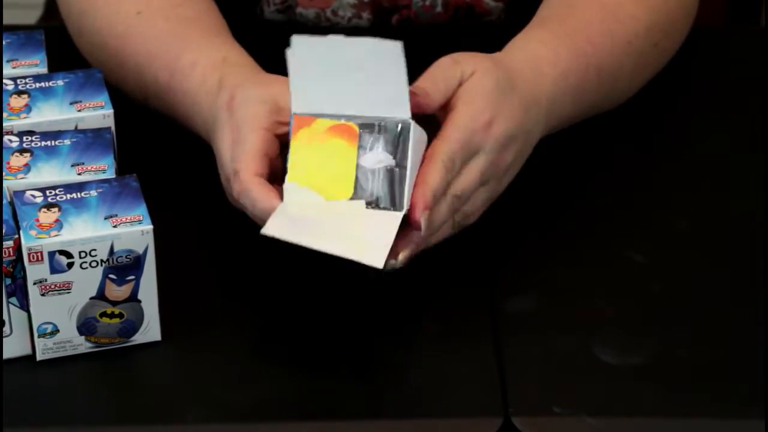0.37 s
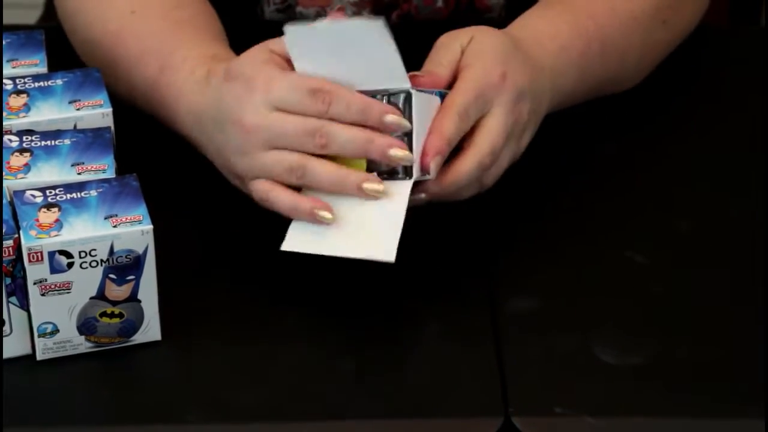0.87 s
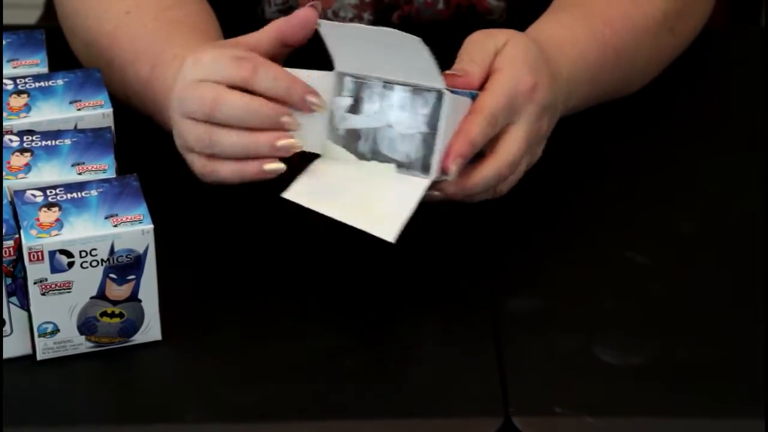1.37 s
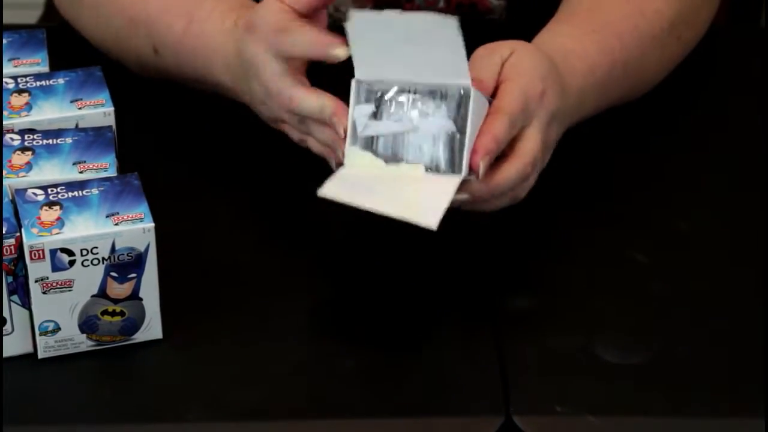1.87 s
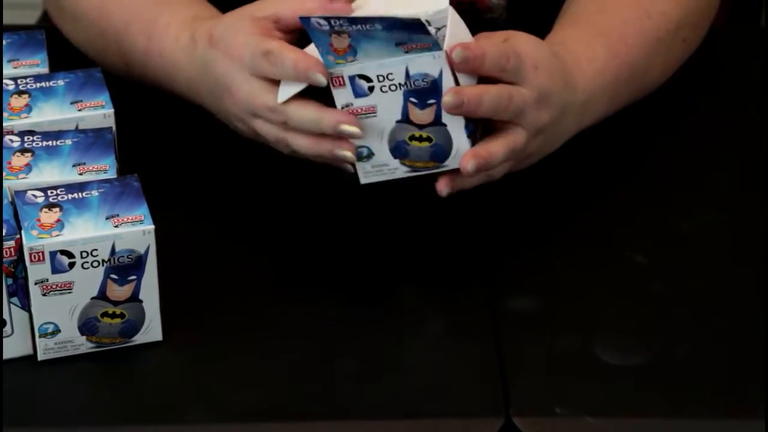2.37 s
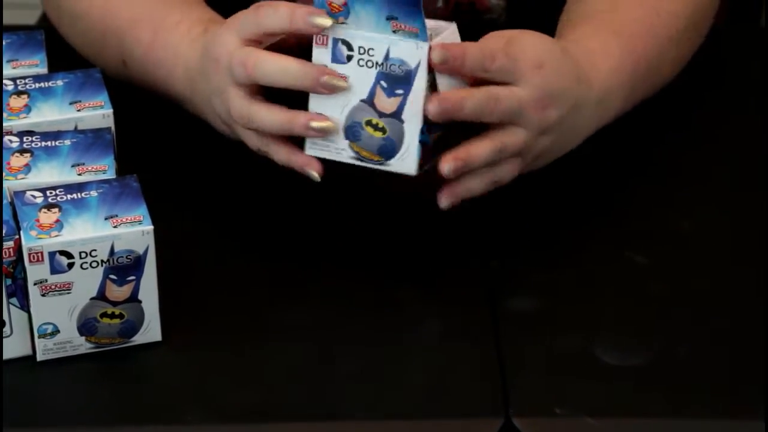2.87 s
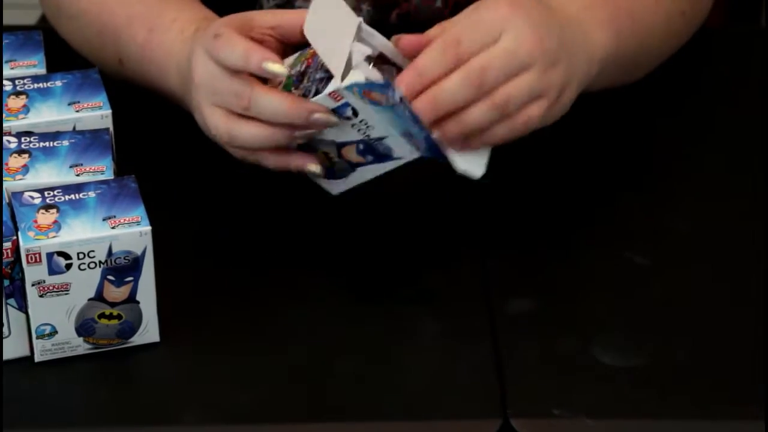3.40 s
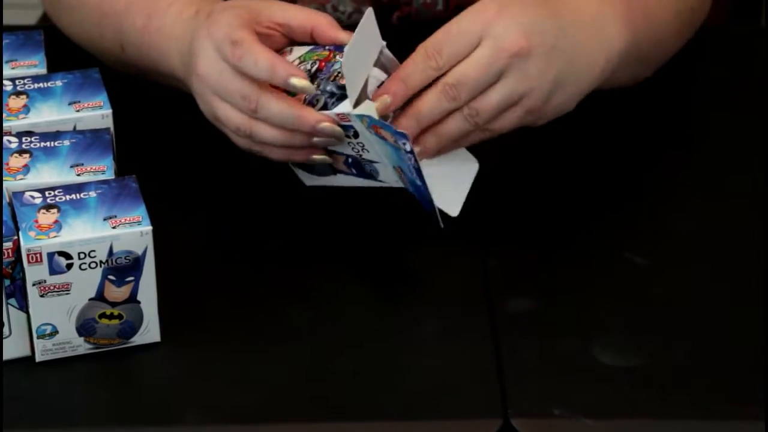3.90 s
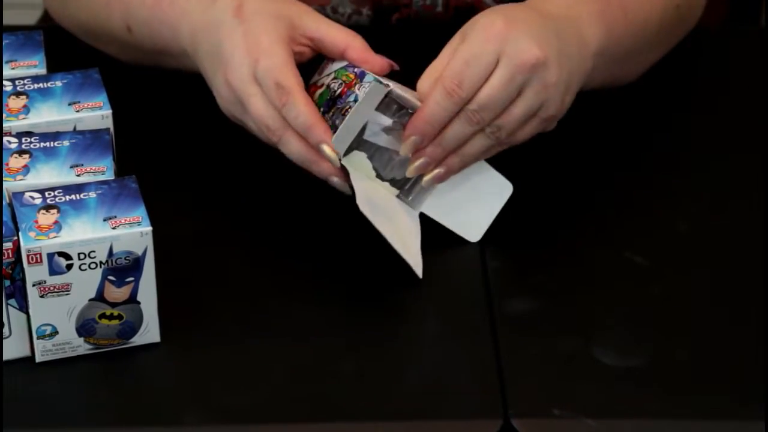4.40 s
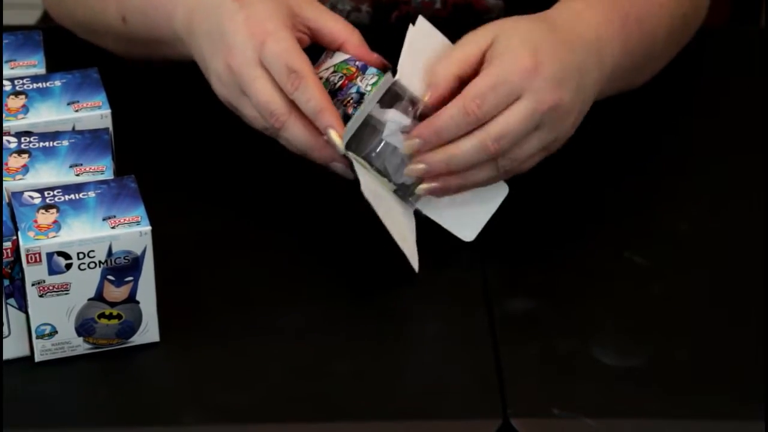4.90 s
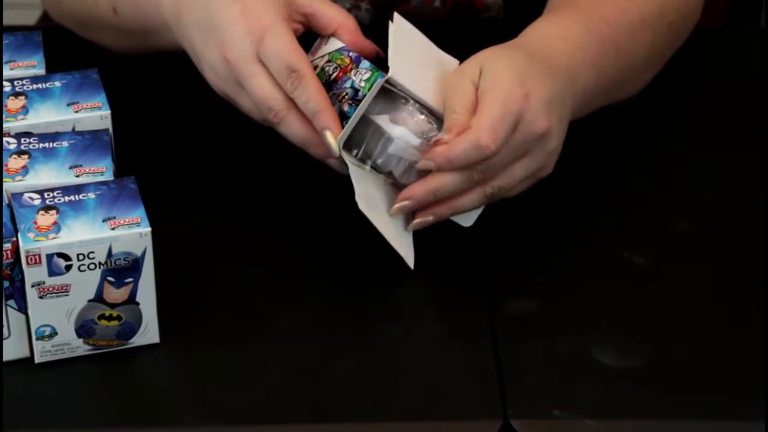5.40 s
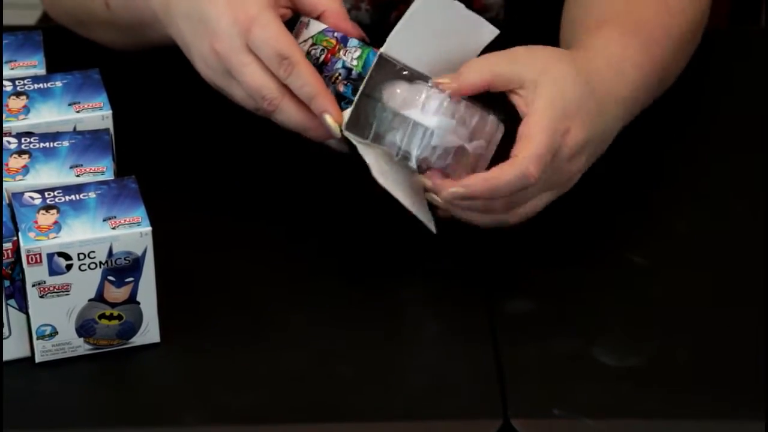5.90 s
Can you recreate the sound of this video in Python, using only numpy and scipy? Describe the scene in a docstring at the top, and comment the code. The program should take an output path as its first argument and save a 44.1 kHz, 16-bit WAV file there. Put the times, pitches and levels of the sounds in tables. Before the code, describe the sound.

Sparse handling of a small hollow card box comes first, with dry light ticks, occasional sharper flap snaps and faint rustling slides. Then thin stiff plastic buckles and scrapes against the card as it is tugged free, much louder and brittle, with overloaded cracks. Close microphone, short room reflections, low background rumble.

```python
"""Close by the microphone in a small room, hands turn a small open cardboard box over a table.
From the start: steady low room rumble, soft pushes on the hollow box, strokes, snaps and light ticks of the card.
From about 4 s a stiff plastic tray is pulled out: louder, denser snaps and scrapes, and the loudest snaps clip.
Snaps are noise bursts through resonances; strokes are random slips through the box modes, ringing creases
and fizz; pushes are short decaying tones; the room answers with tails of fading noise."""
import sys
import numpy as np
from scipy import signal
from scipy.fft import rfft, irfft, next_fast_len
from scipy.io import wavfile
from scipy.ndimage import uniform_filter1d, map_coordinates

SR = 44100
rng = np.random.default_rng(int(sys.argv[2]) if len(sys.argv) > 2 else 0)


def natural_amplitude(level_db):
    """Convert a level in decibels to a linear amplitude factor, elementwise."""
    exponent = np.asarray(level_db, float) / 20
    return 10 ** exponent


def file_out(sig):
    """Save sig as 16-bit WAV at sys.argv[1]."""
    # one column per channel
    cols = np.atleast_2d(sig).T
    # limit, then scale
    lim = np.clip(cols, -1, 1)
    pcm = np.round(lim * 32767).astype(np.int16)
    wavfile.write(sys.argv[1], SR, pcm)


N = 265375  # length in samples, about 6 s

# steady room noise, spectrum before its overall level is set: pitch_hz, relative_level_db
AIR_SPECTRUM = [(12, -49), (20, 5), (163, -5.5), (541, -22), (1150, -17.5), (2810, -46), (14600, -40),
                (15900, -67)]
# decay of the room: pitch_hz, t60_s
ROOM_DECAY = [(300, 0.33), (2000, 0.25), (6000, 0.23), (14000, 0.21)]
# resonances of the box walls: pitch_hz, width_hz, relative_level_db
BOX_MODES = [(320, 114, 1.5), (681, 109, 3), (817, 56.6, 6.5), (1250, 167, 2.5), (1697, 94, 4),
             (2163, 166, 1.5)]
# soft pushes of the hands on the hollow box: time_s, peak_db, pitch_hz
PUSHES = [(0.004, -25.5, 310), (0.417, -29, 352), (4.2, -21, 170), (4.237, -20, 330), (4.561, -19.5, 162),
          (4.61, -19, 327), (5.551, -22.5, 320)]
# strokes of fingers and tray sliding on the card:
# start_s, length_s, sheet_rustle_db, box_walls_over_rustle_db, surface_fizz_over_rustle_db
STROKES = [(-.05, 0.046, -29, -4.5, -8), (0.073, 0.034, -41, -3, -9), (0.247, 0.2, -43.5, 3.5, -6.5),
           (0.476, 0.17, -51, 9.5, -1), (0.843, 0.18, -47.5, -7, 0), (1.099, 0.18, -33.5, -9.5, -4),
           (1.414, 0.19, -48, 0.5, -6.5), (1.662, 0.21, -48.5, 3.5, -3), (2.053, 0.17, -37, 0, -12),
           (2.458, 0.053, -34, -4.5, -7), (2.729, 0.16, -47.5, 3.5, -7.5), (3.063, 0.19, -59, -4, -10),
           (3.28, 0.12, -44.5, 2, -1), (3.45, 0.17, -52, 9, -15), (3.836, 0.12, -34.5, -1, -11),
           (4.122, 0.093, -39.5, 8, -8), (4.296, 0.27, -30.5, -6.5, -17), (4.503, 0.12, -31, 4, -2),
           (4.598, 0.046, -20, 0, -28), (4.727, 0.22, -34.5, -6, -14), (5.152, 0.089, -31, -8, -15),
           (5.248, 0.13, -30.5, -4, -9.5), (5.399, 0.046, -23.5, -32, -12), (5.543, 0.062, -20, -12, -9.5),
           (5.729, 0.15, -23, -19, -18), (5.968, 0.023, -17.5, -11, -18)]
# middle pitch of the creases, lower where the wide tray bends: time_s, pitch_hz
CREASE_PITCH = [(0, 3850), (4.1, 3960), (4.3, 2270), (4.9, 2520), (5.45, 2190), (5.6, 1750), (5.72, 3520)]
# fizz of the sheet surfaces, spectrum: pitch_hz, relative_level_db
FIZZ_SPECTRUM = [(4500, -38), (6500, -10), (10000, -12), (14000, -23), (16500, -27)]
# snaps of card and plastic: time_s, crack_peak_db, knock_over_crack_db, knock_pitch_hz, treble_over_crack_db
SNAPS = [(0.3471, -20, -2, 700, -1), (0.3636, -13, -24, 714, -2), (0.6095, -10.5, -9, 810, -21),
         (0.822, -9.5, -13.5, 780, -3), (0.8408, -14, -12, 875, -22), (1.083, -16, -6.5, 820, -4),
         (1.1216, -18, 1.5, 710, -19), (1.131, -21.5, -5, 794, -19), (1.297, -11, -9, 920, -8),
         (1.4396, -16.5, -4.5, 1190, -36), (2.0783, -8.5, -14, 840, -1.5), (2.1174, -6.5, -2.5, 1290, -4),
         (2.371, -21, -1.5, 785, -23), (2.4092, -7.5, -11.5, 850, -14), (2.8258, -22.5, 8, 1180, -6),
         (3.305, -11.5, -3.5, 910, -38), (3.4143, -14, -5.5, 950, -24), (3.6874, -16, 5.5, 1100, -6),
         (3.8308, -25, -3, 900, 5.5), (3.9, -3.5, -9.5, 930, -13), (3.9164, -7, -7, 810, 7.5),
         (3.936, -12.5, 7, 1410, -26), (3.9855, -7, -28, 1090, -22), (3.996, -3.5, -9.5, 990, -29),
         (4.029, -3.5, -12.5, 1270, 2), (4.1976, -10, 4, 1310, -38), (4.2617, 3, -8, 1200, 5),
         (4.5267, -8.5, -4.5, 730, -9), (4.5481, -2.5, -26, 910, -9), (4.5865, 7, 4, 2180, -7),
         (4.598, -3, -9, 1980, -10), (4.6064, -3, 9.5, 2210, 0.5), (4.6144, 8.5, -9, 710, -2),
         (4.6284, -6.5, 3.5, 755, -24), (4.731, -15.5, 13, 1750, -39), (4.8054, 8.5, -5, 1086, -44),
         (4.818, 1, -7, 1110, -19), (4.8396, 1, -7, 1250, 1.5), (4.8766, -1, -10, 790, -5.5),
         (5.0072, 2.5, -39, 1120, -5.5), (5.0572, -8.5, 1.5, 1680, -42), (5.1064, 5.5, -24, 905, -10.5),
         (5.275, -2.5, 3.5, 1304, -3), (5.5248, -6.5, -5, 1130, -6), (5.5385, -2, -2.5, 1270, -30),
         (5.6868, 4, -34, 1280, -25), (5.7017, -13, -23, 1140, -38), (5.7971, 7, -8.5, 1250, -35),
         (5.8054, 10.5, -12, 1420, -48), (5.8162, 4.5, -31, 1230, -32), (5.8312, 4.5, -1, 1610, -42),
         (5.9565, -3, 4, 1250, -31), (6.002, -1, -29, 1300, -5)]
# light ticks of nails and small folds on card and tray, and faint repeats that follow some snaps a few ms
# later: time_s, crack_peak_db
TICKS = [(.29, -14.5), (.3331, -28), (0.452, -20), (.511, -21), (0.5843, -18), (0.817, -21), (.877, -36),
         (1.1703, -15.5), (1.3987, -24), (1.4216, -32), (1.47, -18.5), (1.684, -16.5), (1.773, -19),
         (1.8035, -23), (1.8243, -18.5), (1.8432, -18.5), (1.9708, -18), (2.0456, -18), (2.1938, -17.5),
         (2.475, -19.5), (2.739, -33), (3.103, -26.5), (3.221, -28), (3.386, -19.5), (3.559, -21),
         (3.597, -18), (3.769, -22.5), (4.158, -16.5), (4.401, -13.5), (4.436, -12.5), (4.469, -9),
         (4.8338, -7), (5.0178, -21), (5.18, -27), (5.2644, -26), (5.3424, -15.5), (5.3565, -30),
         (5.3744, -11), (5.3873, -11.5), (5.4254, -10), (5.473, -8.5), (5.4811, -16), (5.7124, -5),
         (5.7493, -6)]
# shared by all ticks: knock_over_crack_db, knock_pitch_hz, treble_over_crack_db
TICK_TIMBRE = (-13.5, 805, -22)


def unit(x):
    """Scaled to rms 1."""
    return x / np.sqrt(np.mean(x ** 2) + 1e-20)


def peaked(rows):
    """Each row scaled to peak 1."""
    return rows / np.abs(rows).max(axis=1, keepdims=True)


def along(points, hz):
    """(Hz, value) points read on a log axis."""
    point_hz, value = np.transpose(points)
    return np.interp(np.log(hz + 1), np.log(point_hz + 1), value)


def filtered(x, response):
    """x passed through a complex response of frequency."""
    n = x.shape[-1]
    padded = next_fast_len(n + 4096)
    spectrum = rfft(x, padded) * response(np.fft.rfftfreq(padded, 1 / SR))
    return irfft(spectrum, padded)[..., :n]


def mode(f, hz, width_hz):
    """One causal resonance, of gain 1 at its pitch."""
    return 1j * f * width_hz / (hz ** 2 - f ** 2 + 1j * f * width_hz)


def placed(times, rows):
    """Rows of sound added in at their times."""
    at = np.round(times * SR).astype(int)[:, None] + np.arange(rows.shape[1])
    return np.bincount(np.clip(at, 0, N).ravel(), rows.ravel(), N + 1)[:N]


def wander(count, at):
    """A smooth random curve through count normal draws, read at fractional positions."""
    return map_coordinates(rng.standard_normal(count), [at])


def air():
    """Steady rumble and hiss of the room: noise shaped by a fixed spectrum."""
    noise = filtered(rng.standard_normal(N), lambda f: natural_amplitude(along(AIR_SPECTRUM, f)))
    return natural_amplitude(-38) * unit(noise)  # rms level


def room_tail():
    """Diffuse echoes: noise that builds up, then fades at each pitch's own rate, duller than the source."""
    build_s, dull_hz = 0.01, 7000
    waver_db, waver_rate = 2, 150  # the tail's level wavers at random, which makes it grainy
    hz, t, z = signal.stft(rng.standard_normal(SR // 2), SR, nperseg=256)
    swell = 1 - np.exp(-(t / build_s) ** 2)  # the diffuse field takes a moment to build
    fade = np.exp(-np.log(1000) * t / along(ROOM_DECAY, hz)[:, None])
    dulling = np.hypot(1, hz / dull_hz)[:, None]
    tail = signal.istft(z * swell * fade / dulling, SR, nperseg=256)[1]
    tail = tail * natural_amplitude(waver_db * wander(SR // 100, np.arange(len(tail)) * waver_rate / SR))
    return tail / np.linalg.norm(tail)


def room(near, around):
    """What faces the microphone, plus a diffuse tail of what goes all around."""
    out = np.pad(near, (0, SR))
    step = SR // 12  # a fresh random tail for every twelfth of a second
    for start in range(0, N, step):
        wet = signal.fftconvolve(around[start:start + step], room_tail())
        out[start:start + len(wet)] += wet
    return out[:N]


def box(f):
    """The walls of the box ring in the same modes whatever excites them; signs alternate from mode to mode."""
    return sum((-1) ** k * natural_amplitude(db) * mode(f, hz, width) for k, (hz, width, db) in enumerate(BOX_MODES))


def thumps():
    """A soft push swells and dies within a few cycles of the air in the box."""
    rise_s, decay_cycles = 0.0011, 1.4
    time_s, peak_db, hz = np.transpose(PUSHES)[:, :, None]
    t = np.arange(SR // 8) / SR
    envelope = (1 - np.exp(-t / rise_s)) * np.exp(-t * hz / decay_cycles)
    rows = np.sin(2 * np.pi * hz * t) * envelope
    return placed(time_s[:, 0] - .003, natural_amplitude(peak_db) * peaked(rows))  # begins 3 ms ahead of its time


def slips(per_s, scatter_db, clump_db, clump_rate):
    """Stick-slip: random tiny releases of unequal size that come in clumps."""
    chance = rng.random(N)
    sign, size = rng.standard_normal((2, N))
    clumps = wander(N // 100, np.arange(N) * clump_rate / SR)
    return (chance < per_s / SR) * np.sign(sign) * natural_amplitude(scatter_db * size + clump_db * clumps)


def creases(per_s, spread, cycles, scatter_db):
    """Small creases pop in clumps: each gives a sharp tick and rings a few cycles at its own pitch."""
    count = round(per_s * N / SR)
    when = rng.random(count) * N / SR
    pitch, size, phase = rng.standard_normal((3, count, 1))
    clumps = wander(N // 100, when * 70)[:, None]
    gain = natural_amplitude(np.minimum(scatter_db * size + 3 * clumps, 8))
    middle_hz = np.interp(when, *np.transpose(CREASE_PITCH))[:, None]
    hz = np.clip(middle_hz * np.exp(spread * pitch), 900, 5600)
    t = np.arange(SR // 200) / SR
    rings = np.sin(2 * np.pi * hz * t + phase) * np.exp(-t * hz / cycles)
    rings = rings * (1 - np.exp(-t / 0.000081))  # soft onset
    return placed(when, gain * rings), placed(when, gain * np.sign(phase))


def patchy(x):
    """As the sheet bends, bands of its sound swell and sink at random."""
    depth_db = 3  # rms
    z = signal.stft(x, nperseg=512)[2]
    field = uniform_filter1d(rng.standard_normal(z.shape), size=5, axis=0)  # smooth in pitch
    field = uniform_filter1d(field, size=16, axis=1)  # smooth in time
    return unit(signal.istft(z * natural_amplitude(depth_db * unit(field)), nperseg=512)[1][:N])


def rubbing():
    """Slips ring the walls of the box, creases rustle in the sheets; their ticks and finer slips fizz on top."""
    grip_s, let_go_s = 0.032, 0.038  # a stroke swells as the hand grips and fades as it lets go
    t = np.arange(N) / SR
    # the hands never hold the box quite still
    wall, sheet, surface = np.full((3, N), natural_amplitude([[-55], [-52], [-63]]))
    for start, length, db, wall_db, fizz_db in STROKES:
        swell = np.clip((t - start) / grip_s, 0, 1)
        fade = np.exp(-np.maximum(t - start - length, 0) / let_go_s)
        shape = natural_amplitude(db) * swell * fade
        wall = wall + natural_amplitude(wall_db) * shape
        sheet = sheet + shape
        surface = surface + natural_amplitude(fizz_db) * shape
    walls = filtered(slips(900, scatter_db=5, clump_db=2, clump_rate=40), box)
    rustle, ticks = creases(per_s=1500, spread=.45, cycles=4, scatter_db=4.5)
    fine = slips(2500, scatter_db=6, clump_db=5, clump_rate=70)
    fizz = filtered(unit(ticks) + natural_amplitude(8) * unit(fine), lambda f: natural_amplitude(along(FIZZ_SPECTRUM, f)))
    return wall * unit(walls) + sheet * patchy(rustle) + surface * patchy(fizz)


def crack(f):
    """Bright resonances of a snapping sheet."""
    return mode(f, 2390, 3100) - natural_amplitude(6.0) * mode(f, 3660, 1094) + natural_amplitude(0.5) * mode(f, 5140, 750)


def snaps():
    """A buckling sheet releases in a burst of a few ms: a crack, a spray of treble and a knock of the box."""
    release_s = .0006  # a buckle lets go almost at once
    events = list(SNAPS) + [(*row, *TICK_TIMBRE) for row in TICKS]
    time_s, db, knock_db, knock_hz, treble_db = np.transpose(events)[:, :, None]
    t = np.arange(SR // 30) / SR

    def treble(f):
        return mode(f, 6700, 7300) ** 2

    def knock(f):  # each spot favours the box modes near its pitch
        return box(f) * mode(f, knock_hz, 0.83 * knock_hz) ** 2

    # colour, life_s, jolt over the noise, peak_db, level into the room over the near sound_db
    parts = ((crack, .0022, 6, db, -2.5),
             (treble, .0012, 3, db + treble_db, -2.5),
             (knock, .001, 12, db + knock_db, -7.5))
    near, around = 0, 0
    for colour, life_s, jolt, part_db, room_db in parts:
        envelope = (1 - np.exp(-t / release_s)) * np.exp(-(t / life_s) ** 2)
        burst = rng.standard_normal((len(time_s), len(t))) * envelope
        burst = burst + jolt * np.sign(burst[:, 1:2]) * (t == 0)  # one clean jolt, then ragged after-slips
        facing = natural_amplitude(part_db) * peaked(filtered(burst, colour))
        near = near + facing
        around = around + natural_amplitude(room_db) * facing
    return placed(time_s[:, 0], near), placed(time_s[:, 0], around)


def scene():
    """Everything the hands do close by the microphone, in the room."""
    pushes, handling = thumps(), rubbing()
    snaps_near, snaps_around = snaps()
    near = snaps_near + handling + pushes
    around = snaps_around + natural_amplitude(-10) * handling + natural_amplitude(-4.5) * pushes
    return (room(near, around) + air())[None]


def low_pass(x):
    """Removes everything above the highest recorded frequency."""
    return signal.sosfilt(signal.butter(12, 16040, fs=SR, output="sos"), x)


def record(dry):
    """The microphone input clips hard at full scale."""
    clipped = np.clip(dry, -1, 1)
    return low_pass(clipped)


dry = scene()
out = record(dry)
file_out(out)
```